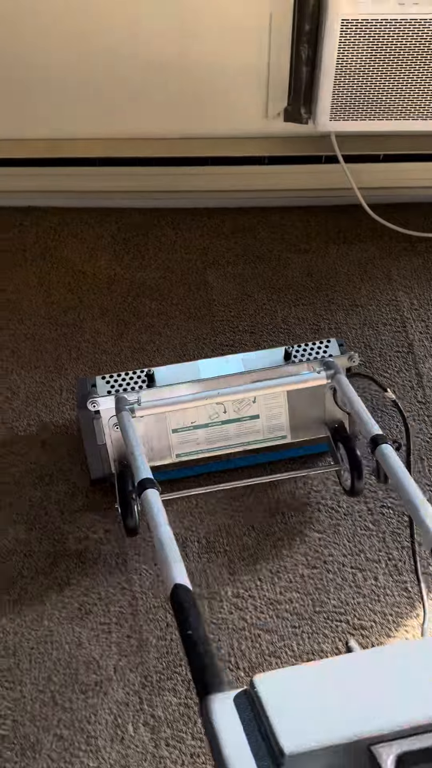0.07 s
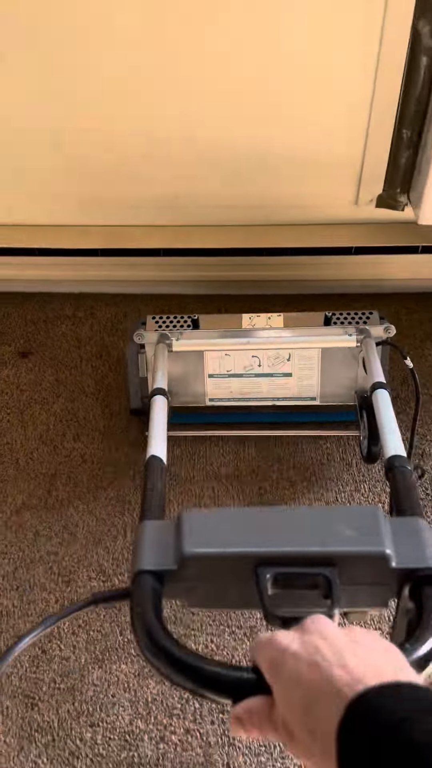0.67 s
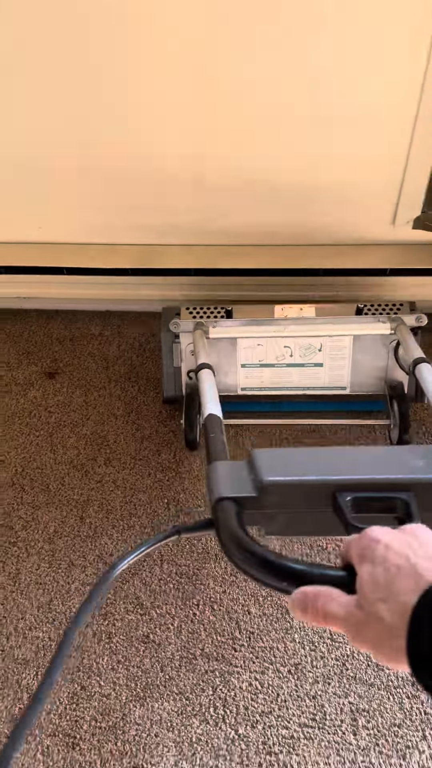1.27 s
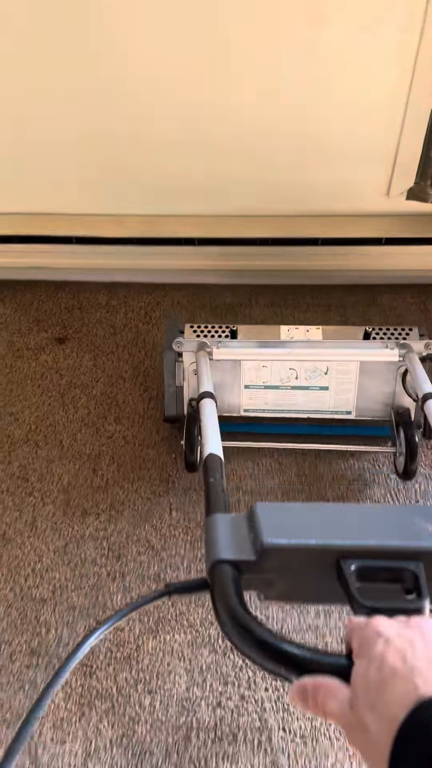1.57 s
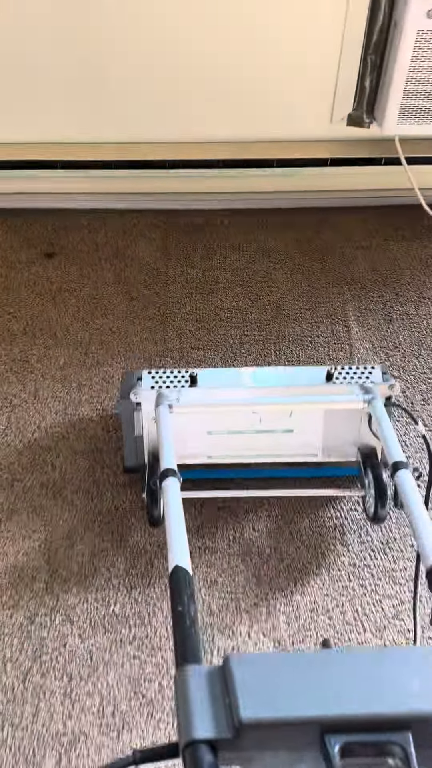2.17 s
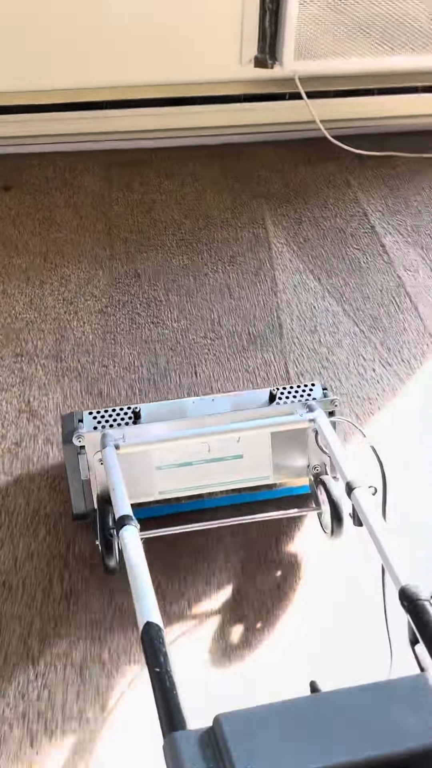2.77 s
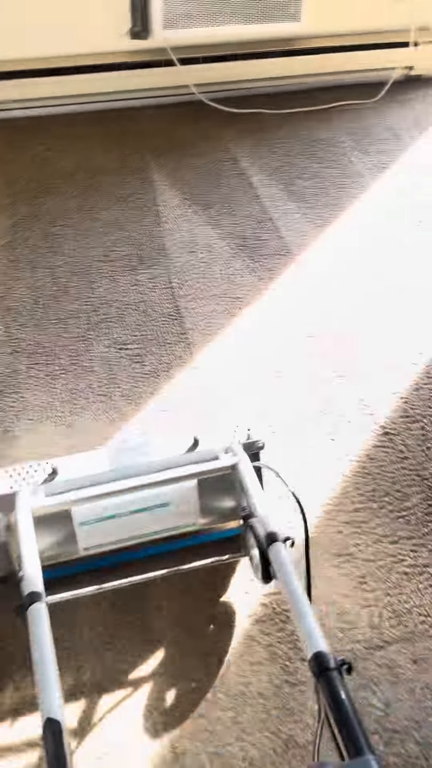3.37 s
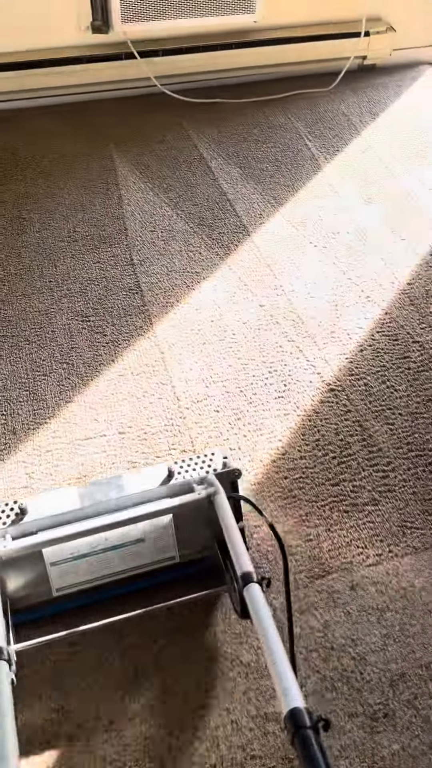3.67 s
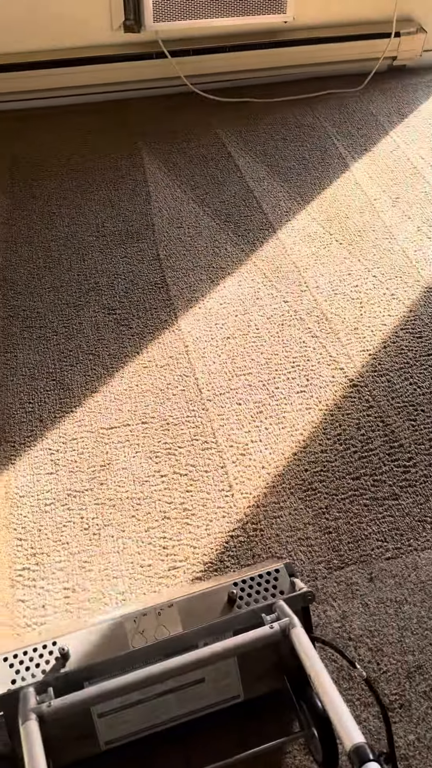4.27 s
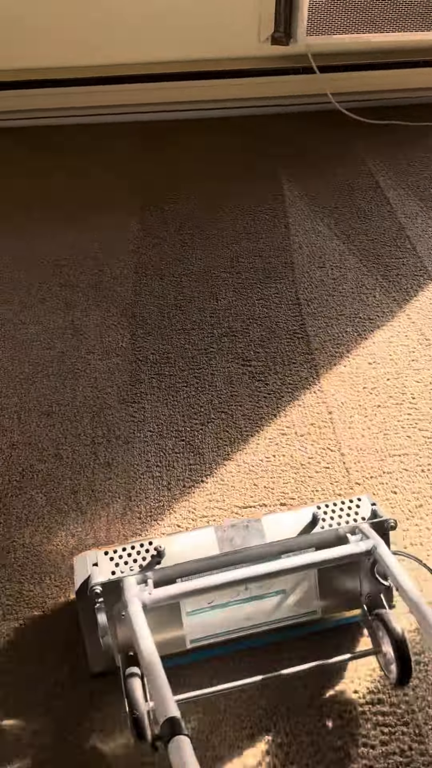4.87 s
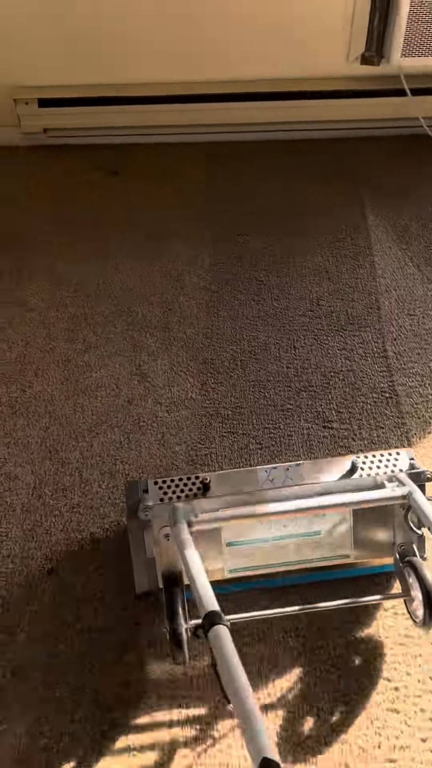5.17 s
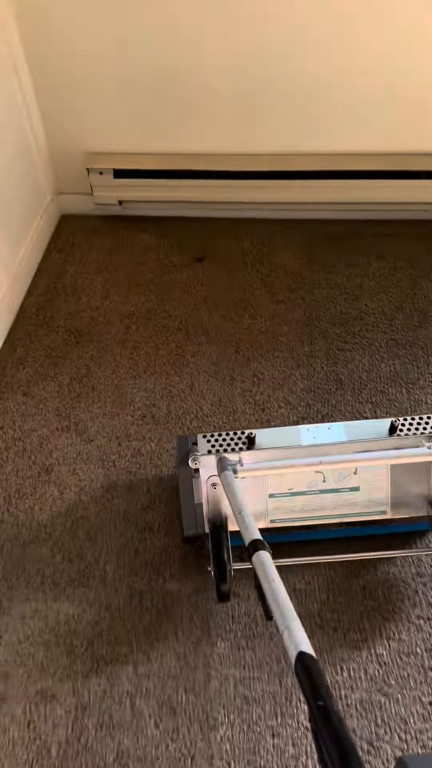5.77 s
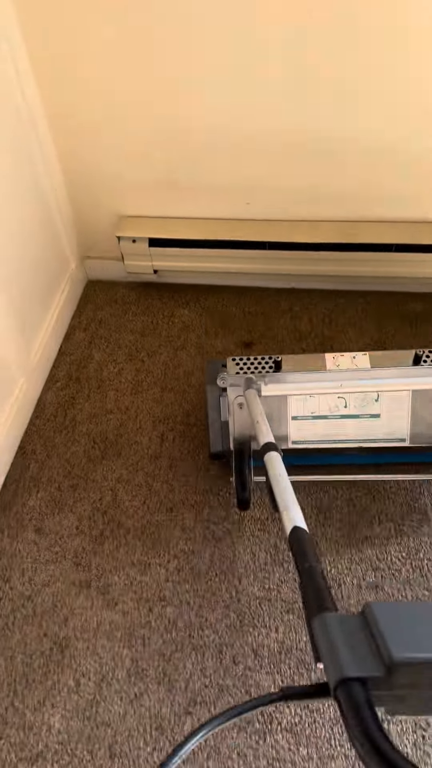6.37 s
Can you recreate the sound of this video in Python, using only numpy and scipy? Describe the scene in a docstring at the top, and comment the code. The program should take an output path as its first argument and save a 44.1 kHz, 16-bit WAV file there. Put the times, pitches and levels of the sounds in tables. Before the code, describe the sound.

An electric carpet machine runs for the whole six and a half seconds, heard close from the handle in a small room. Its motor gives a low hum and a rush of air, the gears whine, and the spinning brushes drum in their housing and sweep the carpet with a bright, steady hiss. Around 1 to 1.3 seconds, faint scrapes and three thin, brief squeals come as it reaches the wall. A soft knock follows at about 2 seconds as it is pulled back, and a low floor rumble grows. A deeper drone swells around 2.6 seconds. Another faint bristle scrape passes near 4.2 seconds. The machine rolls forward again, with a second soft knock just after 5 seconds and the drone rising again until about 6. The hum and whine swell and fade with the movement, while the overall level stays fairly even to the end.

```python
"""Carpet machine in a small room

A machine with spinning brushes is pushed to a wall, pulled back and pushed again, heard from the handle.
Its motor hums at twice the mains frequency and whines through gears. The brushes drum in their housing
and hiss over the carpet. Low tones swell and fade as it crosses the room's loud and quiet spots."""
import sys
import numpy as np
from scipy import signal
from scipy.fft import rfft, irfft, next_fast_len
from scipy.io import wavfile
from scipy.ndimage import uniform_filter1d, map_coordinates

SR = 44100
rng = np.random.default_rng(int(sys.argv[2]) if len(sys.argv) > 2 else 0)


def dump(signal):
    """Clip the signal to [-1, 1] and save it as 16-bit WAV at the path in sys.argv[1]."""
    limited = np.clip(np.atleast_2d(signal).T, -1, 1)
    pcm = np.round(limited * 32767).astype(np.int16)
    wavfile.write(sys.argv[1], SR, pcm)


N = 283122


def amp(db):
    """Turn decibels into a number to multiply a sound by."""
    return 10 ** (np.asarray(db) / 20)


def unit(x):
    """Scale a sound to an average strength (rms) of 1."""
    return x / np.sqrt(np.mean(x ** 2) + 1e-20)


def at_pitch(points, hz):
    """Read a table of (pitch_hz, value) at any pitch, on a log scale."""
    pitches, values = np.transpose(points)
    return np.interp(np.log(hz + 1), np.log(pitches + 1), values)


def curves(rows):
    """Join a table's rows with straight lines: one curve for each column after the time."""
    times, *columns = np.transpose(rows)
    return [np.interp(np.arange(N) / SR, times, column) for column in columns]


def swells(rows):
    """Smooth, bell-shaped swells in dB: one curve for each column of rises."""
    peak_s, half_length_s, *rises = np.transpose(rows)
    bells = np.exp(-((np.arange(N) / SR - peak_s[:, None]) / half_length_s[:, None]) ** 2)
    return np.array(rises) @ bells


def wobble(rate):
    """A smooth random curve that takes `rate` new values a second."""
    return map_coordinates(rng.standard_normal(2048), [np.arange(N) * rate / SR], mode="wrap")


def filtered(x, response):
    """Change the strength and phase of each frequency by response(hz)."""
    size = next_fast_len(N + SR // 2)
    return irfft(rfft(x, size) * response(np.fft.rfftfreq(size, 1 / SR)), size)[..., :N]


def white():
    """Two unrelated white noises."""
    return rng.standard_normal((2, N))


def spread(pair, spectrum):
    """Shape two unrelated sounds to a spectrum and share them between left and right."""
    # how alike the two sides are (1 = the same): pitch_hz, likeness
    alike = [(100, .998), (300, .98), (520, .9), (750, .77), (950, .92), (1200, .98), (1900, .98),
             (2500, .6), (3800, .45), (4800, .55), (5800, .87), (7500, .78), (9300, .84), (10000, .998),
             (13300, .998), (14300, .88), (15700, .8)]

    def response(hz):
        angle = np.arccos(np.clip(at_pitch(alike, hz), 0, 1)) / 2
        return amp(at_pitch(spectrum, hz)) * [np.cos(angle), np.sin(angle)]

    mid, side = filtered(pair, response)
    return unit(np.array([mid + side, mid - side]))


def panned(pair, pan_db):
    """Make the left side pan_db louder than the right."""
    return pair * amp(np.array([pan_db, -pan_db]) / 2)


def patchy(pair, depth_db):
    """Shifting echoes off the floor and walls leave drifting peaks and dips in a noise."""
    spectra = signal.stft(pair, nperseg=512)[2]
    patches = uniform_filter1d(rng.standard_normal(spectra.shape[1:]), size=2, axis=0)  # across pitch
    patches = uniform_filter1d(patches, size=70, axis=1)  # across time
    return signal.istft(spectra * amp(depth_db * unit(patches)), nperseg=512)[1][:, :N]


def tone(cycles, flutter_db, slip_rad, rate):
    """A tone whose level flutters and whose phase slips, `rate` times a second."""
    phase = 2 * np.pi * (cycles + rng.random()) + slip_rad * wobble(rate)
    return unit(amp(flutter_db * wobble(rate)) * np.sin(phase))


def distance():
    """Metres from the wall; the machine's weight rounds off each change of pace."""
    # the machine's path: time_s, distance_m
    travel = [(0, 0.16), (.35, 0.59), (.75, 0.3), (1.15, 0.16), (1.6, 0.088), (2.05, 0.38), (2.6, 1),
              (3.2, 1.6), (3.8, 1.66), (4.9, 1), (5.35, 0.82), (5.85, 0.7), (6.42, 0.29)]
    return uniform_filter1d(curves(travel)[0], size=SR // 5, mode="nearest")


def pace():
    """Rolling speed in metres a second, positive when the machine is pulled back."""
    return np.gradient(distance()) * SR


def bite(turns):
    """The brush rollers press harder once in each of their turns."""
    shaft_turns_per_roller_turn, hardest_s = 4.67, 1.68
    return np.cos(2 * np.pi * (turns - turns[round(hardest_s * SR)]) / shaft_turns_per_roller_turn)


def fan():
    """The motor's fan pushes air through the holes in the cover."""
    # strength of the rush: time_s, level_db
    levels = [(0, -38.5), (.6, -37), (1.2, -39.3), (1.8, -39), (2.2, -39.5), (2.5, -40.5), (3.3, -40.3),
              (4.2, -40.3), (4.7, -38), (5.3, -38.5), (6.42, -37.3)]
    # colour of the rush: pitch_hz, gain_db
    air_colour = [(350, -20.5), (750, 1.5), (950, 1), (1080, 2), (1300, 0), (1520, 3.5), (1750, -3),
                  (2100, -6.5), (3000, -55)]
    return amp(curves(levels)[0]) * spread(patchy(white(), depth_db=0.8), air_colour)


def floor_shake(turns):
    """Unbalanced rollers shake the floor, more on some boards than on others."""
    # strength of the shaking: time_s, level_db
    levels = [(0, -49.5), (1.2, -54), (1.9, -47), (2.3, -38.5), (2.6, -43), (3.7, -41.5), (4.7, -36.5),
              (5.4, -38), (5.9, -36.5), (6.42, -40.5)]
    # colour of the rumble: pitch_hz, gain_db
    rumble_colour = [(15, -45), (30, -29), (42, -2), (52, -21), (58, 4), (66, 3), (80, -3.5), (110, -62)]
    shaft = amp(4.5) * tone(2 * turns, flutter_db=2.5, slip_rad=0.69, rate=3.98)
    roller = amp(-7.5) * tone(2.49 * turns, flutter_db=4.0, slip_rad=0.18, rate=1.7)
    rumble = spread(white(), rumble_colour)
    return amp(curves(levels)[0]) * unit(rumble + shaft + roller)


def bumps():
    """The machine's frame gives short, soft knocks as the push changes."""
    # the knocks: start_s, peak_db
    knocks = [(1.95, -20), (1.958, -16), (5.118, -21.5)]
    # the frame's notes: pitch_hz, ring_s (time to fade by 60 dB), gain_db
    frame_notes = [(300, 0.073, -12), (411, 0.046, 17), (473, 0.026, -8)]
    t = np.arange(SR // 5) / SR
    ring = sum(amp(db - 60 * t / ring_s) * np.sin(2 * np.pi * hz * t) for hz, ring_s, db in frame_notes)
    ring *= 1 - np.exp(-t / 0.001)  # soften the start
    out = np.zeros(N + SR)
    for start_s, peak_db in knocks:
        out[round(start_s * SR):][:len(t)] += amp(peak_db) * ring / np.abs(ring).max()
    return out[:N]


def scrapes():
    """Bristles briefly scrape the foot of the wall or a stiff patch of carpet."""
    # the scrapes: peak_s, half_length_s, pitch_hz, level_db
    events = [(1.0, 0.22, 1850, -46), (1.304, 0.055, 2550, -41.5), (4.193, .13, 1780, -43.5)]
    half_width_hz = 170
    t = np.arange(N) / SR
    out = np.zeros(N)
    for peak_s, half_length_s, pitch_hz, level_db in events:
        band = filtered(rng.standard_normal(N), lambda hz: 1 / (1 + ((hz - pitch_hz) / half_width_hz) ** 4))
        swell = np.exp(-((t - peak_s) / half_length_s) ** 2)
        out += amp(level_db) * swell * unit(band)
    return out


def chatter(turns):
    """The same rough surface passes at every turn of the shaft and makes a faint buzz."""
    # colour of the buzz: pitch_hz, gain_db
    buzz_colour = [(600, -27), (1000, 2.5), (1500, -6), (1900, 2), (2800, -5), (4000, 5), (6000, -7),
                   (9000, -40)]
    surfaces = rng.standard_normal((2, 1500))
    rubbing = np.array([map_coordinates(row, [turns % 1 * len(row)], mode="wrap") for row in surfaces])
    level_db = -55 - 1.5 * distance() + 1.2 * wobble(10)
    return amp(level_db) * spread(rubbing, buzz_colour)


def motor(turns):
    """The motor hums with the mains; the slots in its rotor and a bearing sing thinly above it."""
    # the hum at the handle: time_s, level_db
    hum_levels = [(0.06, -31), (0.43, -25.5), (0.76, -37.5), (0.87, -47.5), (1.39, -30.5), (1.71, -36.5),
                  (2.01, -27.5), (2.38, -32), (2.62, -43), (3.09, -41), (3.89, -26), (5.01, -28),
                  (5.36, -42), (5.66, -44), (5.88, -30.5), (6.36, -26.5)]
    # the tone an octave above the hum: time_s, level_db
    octave_levels = [(0, -40), (.45, -39), (.8, -39), (1.0, -58), (1.13, -42), (1.3, -47), (1.6, -36.5),
                     (2.05, -40), (2.3, -44), (2.55, -38.5), (3.15, -44), (3.6, -39), (3.95, -48),
                     (4.6, -40), (5.05, -55), (5.6, -42), (5.9, -50), (6.25, -38)]
    # tones of the rotor's slots: cycles_per_turn, level_at_wall_db
    slot_tones = [(37, -58), (44, -61), (50, -50.5), (52, -54.5), (55, -59), (58, -61), (60, -60.5),
                  (64, -61), (70, -61), (78, -58), (98, -63.5), (100, -63.5), (106, -62), (108, -64),
                  (126, -64), (160.2, -62), (196, -58.5)]
    # the bearing squeals as the machine presses on the wall: peak_s, half_length_s, rise_db
    squeals = [(1.02, .06, 15), (1.17, 0.032, 16), (1.28, .04, 13)]
    mains_hz, bearing_cycles_per_turn = 60, 228
    mains = mains_hz * np.arange(N) / SR
    hum = amp(curves(hum_levels)[0]) * tone(2 * mains, flutter_db=0.4, slip_rad=0.03, rate=7.8)
    octave = amp(curves(octave_levels)[0]) * tone(4 * mains, flutter_db=1.5, slip_rad=0.05, rate=7.6)
    slots = sum(amp(db) * tone(per_turn * turns, flutter_db=2.5, slip_rad=0.5, rate=14)
                for per_turn, db in slot_tones)
    bearing = tone(bearing_cycles_per_turn * turns, flutter_db=1.5, slip_rad=0.6, rate=30)
    bearing_db = -57.5 + swells(squeals)[0]
    return hum + octave + amp(-0.5 * distance()) * slots + amp(bearing_db) * bearing


def small_gear(turns):
    """The small gear's teeth whine as they meet; the higher tones surge with the rollers' load."""
    # the tooth tone swells as the machine starts and stops rolling: peak_s, half_length_s, rise_db
    strains = [(.54, 0.13, 10.5), (1.06, 0.19, 8), (1.75, 0.23, 10), (2.22, 0.09, 7), (2.65, 0.1, 7.5),
               (3.13, 0.11, 10), (4.75, 0.15, 5), (5.38, 0.27, 6), (6.33, 0.14, 7.5)]
    # multiples of the tooth tone sing out of the gear case: time_s, second_db, third_db, fifth_db
    singing = [(0.08, -47, -46, -56), (.27, -55, -45, -55), (.5, -51.5, -42.5, -55), (.85, -53, -48, -57),
               (1.08, -56, -56, -56), (1.3, -58, -44, -52), (1.5, -52, -46.5, -52), (1.68, -54, -41.7, -53),
               (2.15, -52, -43.3, -54), (2.55, -54, -41.7, -54), (3.35, -54.5, -43.3, -56),
               (3.6, -49, -41.5, -57), (3.93, -53, -39.8, -59), (4.14, -51, -47, -60),
               (4.42, -51, -42, -60), (4.75, -51, -42.3, -59), (5.05, -55, -50, -57),
               (5.28, -47.5, -52, -56), (5.8, -50.5, -50, -53), (5.97, -50, -42, -52),
               (6.14, -51, -45.5, -51), (6.3, -48.5, -46.5, -45.5), (6.42, -51, -48, -52)]
    teeth = 18
    tooth_db = -43 - 0.5 * distance() + swells(strains)[0]
    second_db, third_db, fifth_db = curves(singing)
    mesh = teeth * turns + 0.004 * wobble(60)
    surge_depth = np.clip(0.68 - 0.27 * distance() + 0.13 * wobble(5), 0, 1)
    surge = (1 + surge_depth * bite(turns)) / np.sqrt(1 + surge_depth ** 2 / 2)
    roughness = unit(1 + 0.38 * wobble(70))  # the teeth meet unevenly
    tooth = amp(tooth_db) * roughness * tone(mesh, flutter_db=1.2, slip_rad=0.3, rate=25)
    second = amp(second_db) * tone(2 * mesh, flutter_db=1.2, slip_rad=0.12, rate=15)
    higher = sum(amp(db) * tone(multiple * mesh, flutter_db=0.7, slip_rad=0.12, rate=12)
                 for multiple, db in [(3, third_db), (4, -55), (5, fifth_db)])
    return tooth + second + surge * higher


def drive_gear(drive_cycles):
    """The slower drive gear drones, with a weaker tone an octave up."""
    # strength of the drone: time_s, level_db
    levels = [(.08, -33), (.4, -39), (.7, -46), (1.1, -68), (1.6, -57), (1.95, -40), (2.3, -36),
              (2.63, -32), (3.0, -35.5), (3.4, -46), (3.8, -45.5), (4.85, -50), (5.3, -34), (5.6, -30.5),
              (5.95, -31), (6.42, -38)]
    drone = tone(drive_cycles, flutter_db=1.25, slip_rad=0.06, rate=17)
    octave = amp(-13.5) * tone(2 * drive_cycles, flutter_db=2.0, slip_rad=0.37, rate=7)
    return amp(curves(levels)[0]) * (drone + octave)


def housing(turns, drive_cycles):
    """Gear and bristle tones beat together in the brush housing, which rings roughly when driven hard."""
    # the housing's boom: time_s, level_db, bristle_share (0 to 1)
    boom = [(0, -28, 0.2), (.22, -36.5, 0), (.55, -30, 0.14), (.92, -29.5, 0), (1.12, -31, .15),
            (1.24, -25, 0.8), (1.45, -34.5, 0.5), (1.85, -35, 0.6), (2.17, -30, 0.6), (2.42, -35, 0.4),
            (2.58, -36, 1), (2.75, -31.5, 0.8), (3.08, -34.5, 1), (3.35, -29.5, 1), (3.75, -36, 0.8),
            (3.95, -28, 0.26), (4.24, -25, 0.34), (4.45, -33, .15), (4.72, -35.5, 0.2), (4.92, -29, 0),
            (5.22, -29.5, 0.1), (5.45, -32, .1), (5.7, -32, 0.3), (6.2, -41.5, .3), (6.42, -33, 0.1)]
    # where the housing rings: pitch_hz, width_hz, gain_db
    resonances = [(281.8, 30.4, 0)]

    def shell(hz):
        return sum(amp(db) * 1j * hz * width / (pitch ** 2 - hz ** 2 + 1j * hz * width)
                   for pitch, width, db in resonances)

    boom_db, bristle_share = curves(boom)
    gear = tone(3 * drive_cycles, flutter_db=0.8, slip_rad=0.2, rate=14)
    bristle_rows = tone(10.09 * turns, flutter_db=1.0, slip_rad=0.2, rate=14)
    beating = np.sqrt(1 - bristle_share) * gear + np.sqrt(bristle_share) * bristle_rows
    ring = unit(filtered(rng.standard_normal(N), lambda hz: shell(hz) ** 2))  # squaring narrows the ring
    extra_boom_db = np.maximum(boom_db - np.median(boom_db), 0)
    ring_gain = amp(-8 + 0.7 * extra_boom_db)
    return amp(boom_db) * (beating + ring_gain * ring) / np.sqrt(1 + ring_gain ** 2)


def churn():
    """The bristles' blows ring the gap under the housing, whose pitch slides as the machine moves."""
    # the ringing gap: time_s, pitch_hz, level_db
    gap = [(0, 455, -37), (.3, 470, -38), (.7, 450, -45), (1.1, 400, -41), (1.55, 400, -47),
           (1.8, 390, -42), (1.97, 385, -32.5), (2.15, 385, -39), (2.45, 385, -37), (2.9, 365, -37.5),
           (3.25, 340, -36), (3.5, 370, -38.5), (3.72, 360, -35), (3.95, 358, -33), (4.15, 390, -42),
           (4.42, 400, -45), (4.68, 410, -36.5), (4.95, 415, -35.5), (5.28, 440, -35), (5.6, 430, -39),
           (5.88, 442, -34), (6.1, 445, -39), (6.42, 450, -41)]
    width_hz = 50
    pitch_hz, level_db = curves(gap)
    slow = filtered(white(), lambda hz: 1 / (1 + 2j * hz / width_hz) / (1 + (hz / width_hz / 2) ** 4))
    phase = 2 * np.pi * np.cumsum(pitch_hz) / SR
    band = slow[0] * np.cos(phase) + slow[1] * np.sin(phase)  # lifts the slow noise up to the pitch
    return amp(level_db) * unit(band)


def drumming():
    """Tufts of bristles strike the floor in quick, uneven blows that ring it in three broad bands."""
    # the brushes dig into the carpet: peak_s, half_length_s, hollow_rise_db, middle_rise_db
    digs = [(.04, 0.059, -4.5, 9.5), (1.96, 0.1, 3, -2.5), (3.8, 0.18, 1, 5), (4.92, .12, 0, 0),
            (5.25, 0.33, 1, 1)]
    # colours of the three bands, low to high: pitch_hz, gain_db
    hollow_colour = [(25, -37), (90, -10), (125, -12), (150, -6), (180, -7.5), (215, -3.5), (255, -8),
                     (310, 0), (385, 1), (440, -17.5), (600, -64)]
    middle_colour = [(330, -22), (420, -5), (490, -4.5), (560, -13), (750, -62)]
    hard_colour = [(440, -32), (540, -1.5), (620, 1), (730, -10.5), (1100, -23.5), (2500, -57)]
    metres, pull_speed = distance(), pace()
    hollow_dig_db, middle_dig_db = swells(digs)
    blows = amp(np.abs(pull_speed) + 0.8 * wobble(90))  # faster rolling works the bristles harder
    # pulling back runs against the brushes' spin, so the two lower bands grow
    hollow_db = -35 + 0.6 * metres + 0.5 * pull_speed + hollow_dig_db
    middle_db = -38 + 0.3 * metres + pull_speed + middle_dig_db
    hard_db = -38 - 1.5 * metres
    out = np.zeros((2, N))
    for colour, level_db in [(hollow_colour, hollow_db), (middle_colour, middle_db), (hard_colour, hard_db)]:
        fading_db = 0.74 * np.tanh(wobble(11))  # rise and fall among the room's echoes
        out += amp(level_db + fading_db) * spread(white() * blows, colour)
    return out


def brushes(turns):
    """Bristles sweep the carpet with a swish and a rasp, and flick off it with a hiss and a fine fizz."""
    # brush noise at the handle: time_s, swish_db, rasp_db, hiss_db
    levels = [(0, -41, -43.5, -39), (.65, -39.5, -44, -37), (1.4, -40.7, -44.5, -38.5),
              (1.8, -40, -43.5, -36.5), (2.5, -40, -43, -37.5), (3.05, -40, -44, -39),
              (3.65, -42, -47.5, -40.5), (4.25, -43, -46.5, -39.5), (4.5, -43.2, -47, -40),
              (5, -40.5, -44.5, -38.5), (5.45, -40, -44.2, -38), (5.95, -40, -43, -39),
              (6.3, -38.5, -43.2, -36)]
    # strength of the fizz: time_s, level_db
    fizz_levels = [(0, -36.3), (.6, -33.7), (1.4, -33.8), (2.2, -37.2), (3, -38), (3.5, -39.7), (4.2, -40),
                   (4.7, -37.6), (5.4, -35), (5.8, -36), (6.42, -35)]
    # lean to the left as the handle swings: time_s, swish_pan_db, rasp_pan_db
    sway = [(0, 1.3, -1.5), (.65, -1.5, 0), (1.2, -1, 2), (1.65, 0, 1.5), (2.1, 1.5, -2.5),
            (3.13, 1.5, -2.5), (3.5, 2.2, 0), (4.6, 4, .5), (5.4, 2.7, -1.3), (6.42, 1, -1.5)]
    # colours of the four noises, low to high: pitch_hz, gain_db
    swish_colour = [(1300, -11.5), (1800, -6), (2080, 2), (2300, -0.5), (2620, 2.5), (3000, -1.5),
                    (3250, -0.5), (3800, -60)]
    rasp_colour = [(2800, -28), (3300, 1), (3650, 3), (3900, -1), (4150, 1.5), (4900, -6.5), (8000, -54)]
    hiss_colour = [(2500, -31), (4800, -4), (5800, 2), (7000, 0), (8000, 0), (9000, -1), (10300, -6),
                   (12000, -49)]
    fizz_colour = [(7500, -35), (9000, -8), (10000, -1.5), (11500, -1.5), (13000, -.5), (14000, 2.5),
                   (15700, 2.5)]

    def flicks():
        return white() * amp(2.8 * rng.standard_normal(N))

    swish_db, rasp_db, hiss_db = curves(levels)
    swish_pan_db, rasp_pan_db = curves(sway)
    pressure_db = 0.12 * bite(turns) + 0.13 * wobble(7.6)
    swish = amp(swish_db + 0.37 * wobble(25)) * spread(patchy(white(), depth_db=1.2), swish_colour)
    rasp = amp(rasp_db) * spread(patchy(white(), depth_db=1.3), rasp_colour)
    hiss = amp(hiss_db) * spread(patchy(flicks(), depth_db=1.3), hiss_colour)
    fizz = amp(curves(fizz_levels)[0] + 0.8 * wobble(8)) * spread(flicks(), fizz_colour)
    return amp(pressure_db) * (panned(swish, swish_pan_db) + panned(rasp, rasp_pan_db) + hiss + fizz)


def scene():
    """One motor shaft turns the gears and brushes; all the sounds add up."""
    # shaft speed, slowed a little by the carpet's drag: time_s, turns_per_s
    speed = [(0, 29.21), (0.5, 29.18), (0.9, 29.26), (1.25, 29.33), (1.7, 29.22), (2.3, 29.23),
             (2.9, 29.13), (3.5, 29.19), (4.05, 29.19), (4.35, 29.08), (4.6, 29.16), (4.85, 29.13),
             (5.15, 29.28), (5.45, 29.14), (5.8, 29.25), (6.42, 29.22)]
    turns = np.cumsum(curves(speed)[0]) / SR
    drive_cycles = 3.271 * turns
    machine = motor(turns) + small_gear(turns) + drive_gear(drive_cycles) + chatter(turns)
    body = housing(turns, drive_cycles) + fan() + floor_shake(turns)
    return machine + body + drumming() + churn() + brushes(turns) + scrapes() + bumps()


def record(dry):
    """Left and right differ in level and, in the treble, in phase; the very top is cut off."""
    # how much louder the left side is: pitch_hz, gain_db
    tilt = [(100, .3), (200, .8), (300, 2.1), (550, .4), (1200, .1), (2500, .6), (4500, .2), (8000, 0)]
    # how far the left side runs ahead: pitch_hz, lead_rad
    lead = [(2000, 0), (3250, -.9), (4200, .4), (4700, .4), (5300, -.3), (6100, -.6), (8800, -2.1),
            (10100, -3.1), (13300, -3.18), (14000, -3.55), (15600, -4.6)]
    top_hz = 15800
    sides = np.array([[0.5], [-0.5]])

    def response(hz):
        return amp(sides * at_pitch(tilt, hz)) * np.exp(1j * sides * at_pitch(lead, hz)) * (hz < top_hz)

    return filtered(dry, response)


dry = scene()
out = record(dry)
dump(out)
```